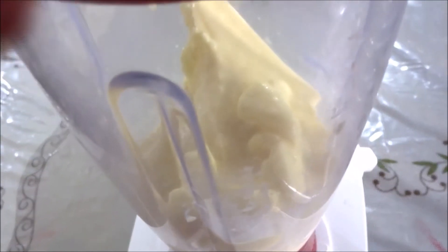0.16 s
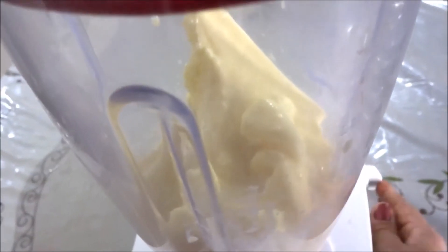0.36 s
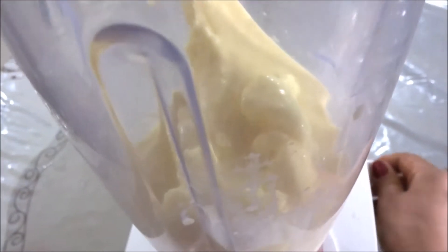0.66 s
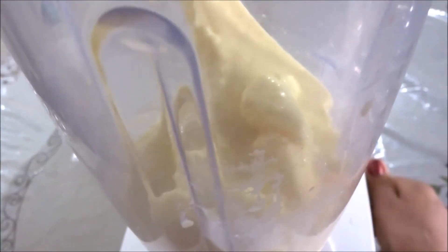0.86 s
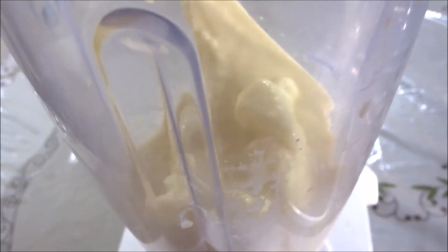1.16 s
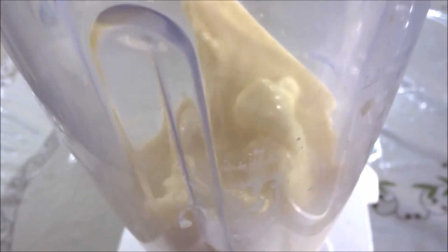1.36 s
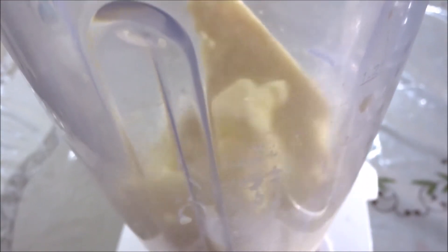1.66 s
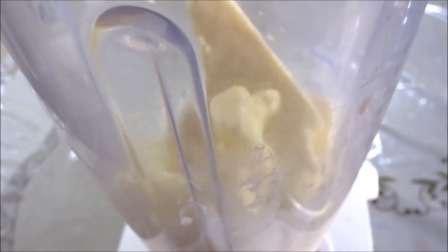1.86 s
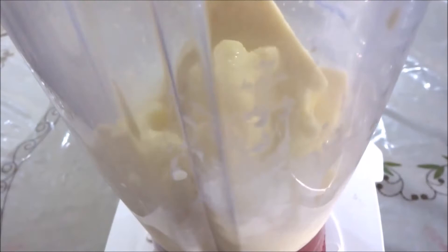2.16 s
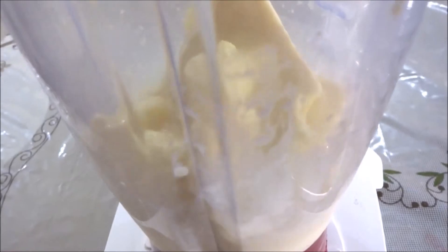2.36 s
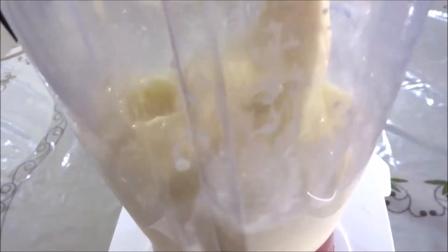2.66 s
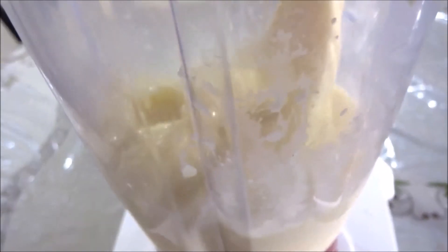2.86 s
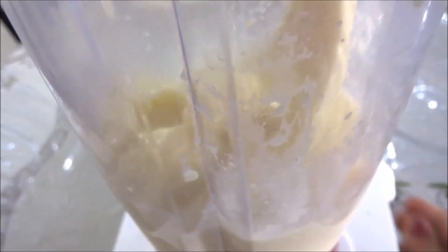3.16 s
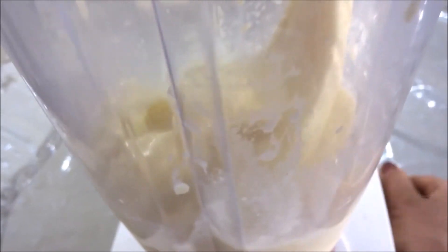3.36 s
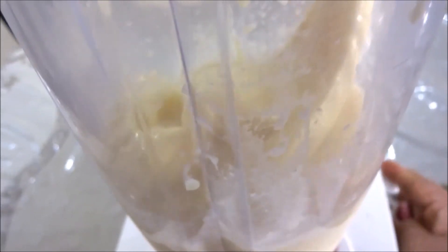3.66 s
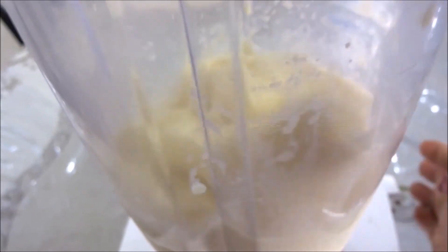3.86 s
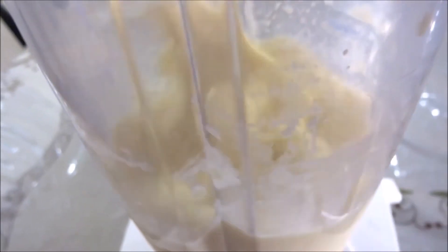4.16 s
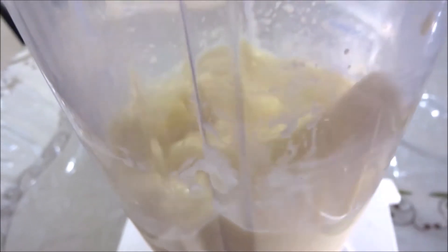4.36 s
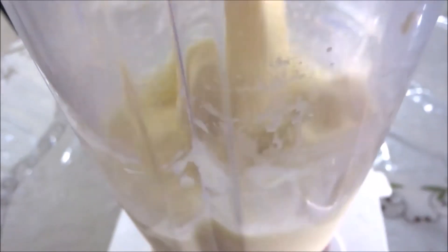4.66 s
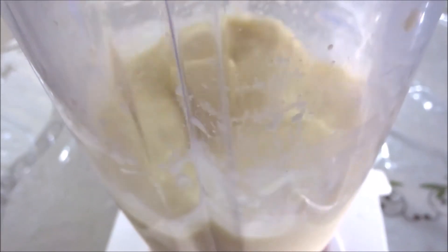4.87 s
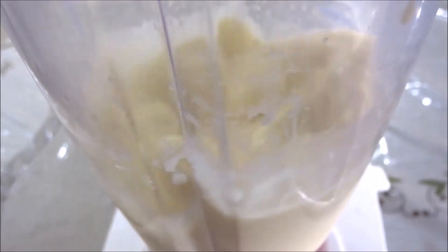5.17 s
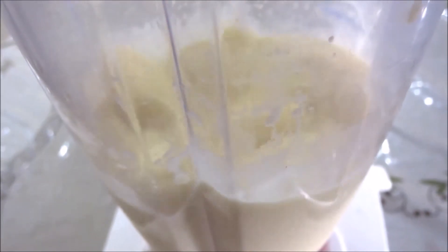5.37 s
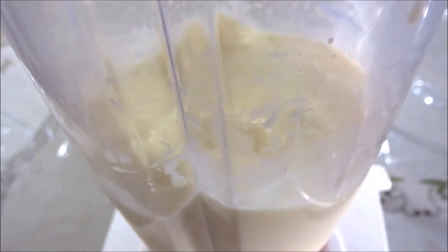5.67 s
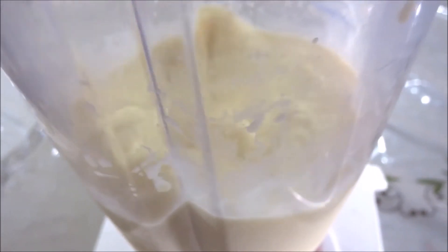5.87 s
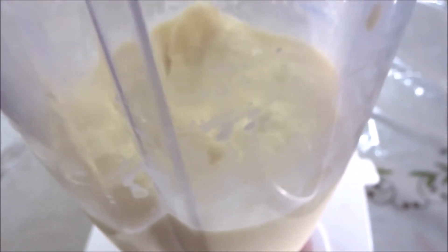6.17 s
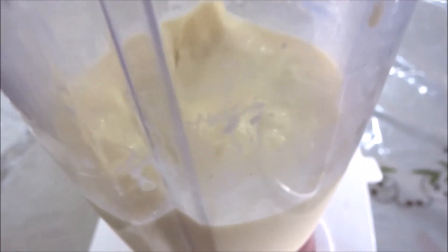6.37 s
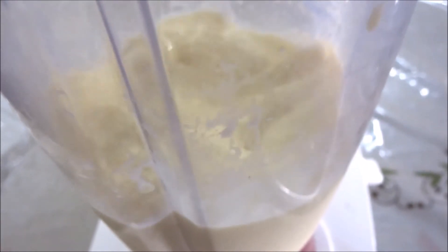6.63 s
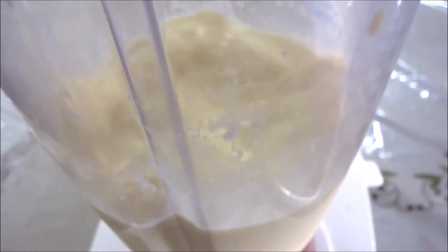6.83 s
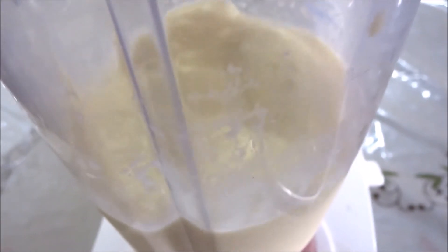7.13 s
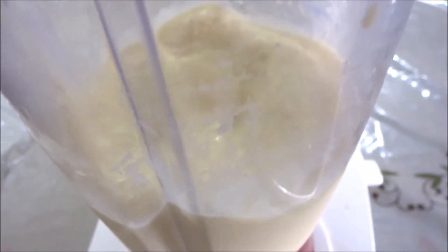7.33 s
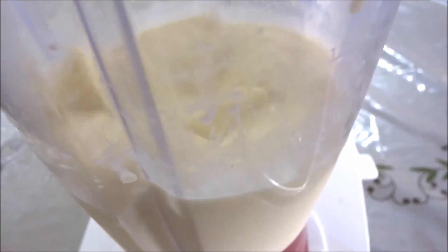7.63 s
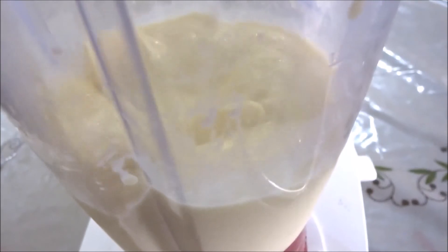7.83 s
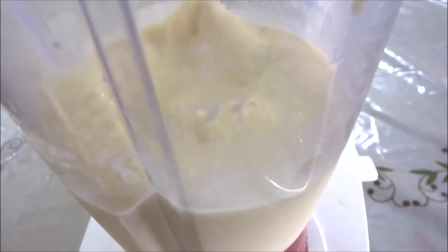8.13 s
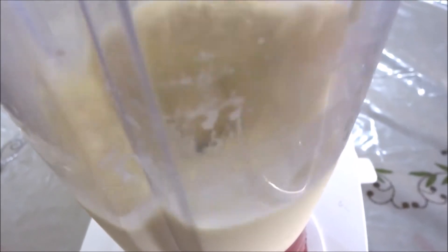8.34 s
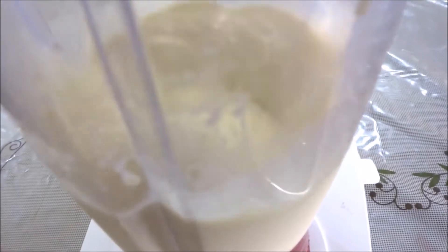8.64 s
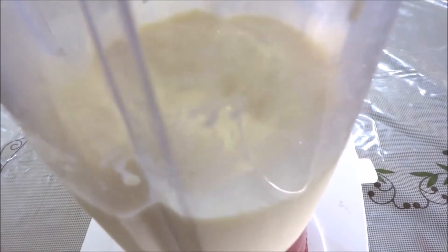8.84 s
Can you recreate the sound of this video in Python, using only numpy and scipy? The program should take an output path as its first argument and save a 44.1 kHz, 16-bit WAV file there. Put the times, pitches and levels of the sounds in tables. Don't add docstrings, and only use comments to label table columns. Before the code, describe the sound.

Skin rustles close by, a plastic knob clicks, then a kitchen mixer grinder jolts on with a rattling jar and whines over a churning roar.

```python
import sys
import numpy as np
from scipy import signal
from scipy.fft import rfft, irfft
from scipy.io import wavfile
from scipy.ndimage import uniform_filter1d

SR = 44100
rng = np.random.default_rng(int(sys.argv[2]) if len(sys.argv) > 2 else 0)


def gain_from_db(level_db):
    decades = np.asarray(level_db, float) / 20
    return 10 ** decades


def wrap_up_sound(samples):
    columns = np.atleast_2d(samples).T
    tamed = np.clip(columns, -1, 1)
    steps = np.round(tamed * 32767).astype(np.int16)
    wavfile.write(sys.argv[1], SR, steps)


N = 396900
T = np.arange(N) / SR
MOTOR_ON_S = .859

# freq_hz, level_db (per Hz)
RUB_COLOUR = [(70, -38), (150, -11.5), (400, -2), (900, -11.5), (1500, -17), (16000, -62)]
RUSTLE_COLOUR = [(300, -35), (1500, -7.5), (3500, -3.5), (7000, -8), (11000, -13), (16000, -18)]
CRINKLE_COLOUR = [(2000, -21), (6000, -1), (10000, -2), (16000, -15)]
# start_s, length_s, rub_db, rustle_db, crinkle_db
HAND_STROKES = [
    (-.02, 0.059, -49, -55, -39.5),
    (0.031, 0.087, -48.5, -40.5, -50),
    (0.122, 0.094, -50, -55, -60),
    (0.247, 0.037, -62, -53, -60),
    (0.289, 0.052, -70, -45.5, -50),
    (0.475, .11, -84, -55, -57),
    (0.618, 0.036, -82, -67, -59),
    (0.726, 0.039, -82, -60, -72),
    (.83, .05, -66, -62, -77),
]
# rub_db, rustle_db, crinkle_db
RESTING_DB = (-84, -58.5, -68)
# time_s, pitch_hz, level_db
SQUEAK_GLIDE = [
    (.058, 11000, -62),
    (.066, 12900, -42),
    (.078, 13400, -42),
    (.095, 12800, -36),
    (.104, 13200, -60),
]
# freq_hz, likeness (0-1)
SIDE_LIKENESS = [(60, 1.0), (110, .99), (200, .96), (380, .97), (700, .975), (1290, 0.99), (2380, 0.91),
                 (4400, 0.9), (8120, 0.95), (15000, 0.94)]
# freq_hz, level_db (per Hz)
HISS_COLOUR = [(24, -68), (40, -42), (193, -36), (400, -10.5), (464, -23), (659, -6), (935, -7.5),
               (1290, 3.5), (2030, 1.5), (2480, -6), (3800, -5), (6260, -23), (15800, -15)]
# pitch_hz, level_db
APPLIANCE_HUM = [(576, -76.5), (662, -74), (1319, -95), (1981, -68)]
# start_s, peak_db, ring_share (0 dry tick, 1 all ring)
KNOB_CLICKS = [
    (.2522, -11, .65),
    (.3013, -9, .65),
    (.3048, -8, .65),
    (.3075, -23, .6),
    (.3098, -19, .8),
    (.404, -38, .1),
    (.4246, -23, .05),
    (.4565, -42, .3),
    (.513, -37, .3),
    (.7475, -38, .3),
]
# pitch_hz, level_db, t60_s
KNOB_MODES = [(3500, -4, .02), (3750, -1, .03), (4100, -4, .022), (4450, -4, .025), (4700, -3, .025),
              (5500, -8, .01), (6420, -6, .012), (7550, -7, .012), (9800, -12, .006), (11700, -7, .014),
              (13900, -9, .005)]
# start_s, peak_db
JAR_KNOCKS = [(.456, -44), (.515, -42), (.643, -44), (.7705, -35), (.7775, -31), (.8595, -18), (.8655, -17),
              (.874, -21), (.8855, -18), (.898, -22), (.907, -24), (.916, -20), (.925, -22), (.934, -20),
              (.944, -20), (.957, -29), (.975, -30)]
# pitch_hz, level_db, t60_s
BASE_MODES = [(1050, -11, .04), (1130, -5, .05), (1220, 0, .09), (1380, -1, .05), (1590, 0, .07),
              (1720, -4, .04), (2100, -17, .05)]
# time_s, blade_pass_hz
MOTOR_LOAD = [(.861, 666), (1.304, 640), (1.349, 605), (1.689, 569), (1.897, 678), (2.222, 655),
              (2.42, 611), (3.459, 611), (3.46, 755), (4.25, 861), (4.749, 757), (4.895, 771), (5.079, 917),
              (6.93, 895), (6.995, 792), (7.407, 884), (8.284, 888), (9, 897)]
# release_s, drag_hz, length_s
BRAKING_LUMPS = [(1.779, 107, .091), (2.75, 15, .31), (2.745, 34, .07), (3.24, -14, .07),
                 (3.888, 119, .099), (4.41, 65, .34), (5.255, 280, .12), (5.315, 150, .06),
                 (5.457, 272, .097), (5.657, 45, .09), (6.111, 53, .122), (6.389, 39, .09),
                 (6.585, 45, .05), (6.695, 200, .08), (7.158, 56, .04), (7.528, 165, .106),
                 (7.69, 208, .088), (7.992, 44, .044), (8.225, 25, .108), (8.725, 113, .417)]
# multiple (of blade pass), slow_db, fast_db
WHINE_ORDERS = [(3, -58, -60), (4, -59, -56), (5, -53, -62), (6, -52, -57), (8, -52, -59), (10, -62, -54),
                (14, -63, -53), (16, -59, -55.5), (20, -61, -64), (24, -55, -70)]
# pitch_hz, level_db
FIRST_RESPONSE = [(350, -68), (430, -51), (560, -56.5), (605, -50), (700, -54.5), (862, -54), (888, -41.5),
                  (920, -47)]
OCTAVE_RESPONSE = [(800, -56), (1040, -51), (1090, -37.5), (1190, -38.5), (1218, -50), (1280, -43.5),
                   (1500, -48.5), (1800, -46)]
# pitch_hz, width_hz, lift_db
OCTAVE_RING = [(1203, 37, 8.5)]
# pitch_hz, width_hz, lift_db
TWELFTH_RING = [(10780, 260, 28.7)]
# pitch_hz, width_hz, lift_db
CASING_RINGS = [(1580, 150, 15), (4000, 200, 11), (4900, 200, 6.5), (14800, 900, 7)]
# freq_hz, level_db (per Hz)
SLOW_ROAR = [(24, -66), (40, -32.5), (311, -29.5), (513, -24), (627, -28), (747, -20), (959, -15.5),
             (1170, -1.5), (1750, -12), (2480, -3.5), (3110, -4), (4520, -5), (6920, -9), (8240, -6),
             (15800, -15.5)]
FAST_ROAR = [(24, -67), (40, -37), (311, -33), (500, -28.5), (959, -18.5), (1110, -9), (1360, -9),
             (1620, -6.5), (2190, -5), (3030, -2), (3700, -6.5), (4410, -5), (6920, -8.5), (9340, -6.5),
             (15800, -17.5)]
# pitch_hz, width_hz, lift_db
JAR_RINGS = [(920, 60, 3), (1135, 35, 6), (1197, 28, 7), (1325, 80, 5), (1440, 35, 4), (1570, 55, 6),
             (1800, 60, 3), (2780, 90, 2), (2880, 50, 2), (3080, 130, 4), (3640, 70, 3), (4030, 120, 2),
             (4550, 400, 2), (6050, 500, 2), (8350, 500, 3)]
# freq_hz, level_db
MIC_RESPONSE = [(20, 0), (15740, 0), (15830, -46), (16950, -48), (17000, -90)]


def evened(x):
    return x / np.sqrt(np.mean(x ** 2) + 1e-20)


def read(points, hz):
    f, value = np.transpose(points)
    return np.interp(np.log(hz + 1), np.log(f + 1), value)


def columns(rows, t=T):
    s, *rest = np.transpose(rows)
    return [np.interp(t, s, c) for c in rest]


def smooth_twice(x, size):
    return uniform_filter1d(uniform_filter1d(x, size), size)


def drift(smooth_s):
    return evened(smooth_twice(rng.standard_normal(N), max(int(smooth_s * SR), 1)))


def noise(colour_db, patchy_db, gust_db, count=N):
    frames = count // 256 + 5
    hz = np.fft.rfftfreq(1024, 1 / SR)[:, None]
    a, b, c, d, patches = rng.standard_normal((frames, 513, 5)).T
    patches = uniform_filter1d(patches, size=14, axis=0)
    patches = evened(uniform_filter1d(patches, size=12, axis=1))
    gusts = evened(uniform_filter1d(rng.standard_normal(frames), size=8))
    same = np.clip(read(SIDE_LIKENESS, hz), -1, .996)
    left = a + 1j * b
    right = same * left + np.sqrt(1 - same ** 2) * (c + 1j * d)
    level_db = colour_db(hz, np.arange(frames) * 256 / SR) + patchy_db * patches + gust_db * gusts
    spectra = np.array([left, right]) * gain_from_db(level_db)
    sound = signal.istft(spectra, nperseg=1024, noverlap=768)[1][:, :count]
    return np.pad(evened(sound), ((0, 0), (0, N - count)))


def ring(modes, scrape, scrape_s):
    t = T[:6000]
    x = sum(gain_from_db(db - 60 * t / t60) * np.sin(2 * np.pi * hz * t) for hz, db, t60 in modes)
    x = signal.fftconvolve(x, scrape * gain_from_db(-60 * T[:len(scrape)] / scrape_s))
    return x / abs(x).max()


def add(mix, s, sound):
    part = mix[round(s * SR):][:len(sound)]
    part += sound[:len(part)]


def high_pass(x, hz):
    return signal.sosfilt(signal.butter(4, hz, "high", fs=SR, output="sos"), x)


def humps(modes, hz):
    return sum(db / (1 + (2 * (hz - f) / width) ** 2) for f, width, db in modes)


def filtered(x, colour_db):
    return irfft(rfft(x) * gain_from_db(colour_db(np.fft.rfftfreq(N, 1 / SR))), N)


def strokes():
    touch_s, lift_s = 0.014, .018
    power = gain_from_db(RESTING_DB)[:, None] ** 2 * np.ones(N)
    for s, length, *layers_db in HAND_STROKES:
        landing = np.clip((T - s) / touch_s, 0, 1)
        shape = landing * np.exp(-np.maximum(T - s - length, 0) / lift_s)
        power = power + (gain_from_db(layers_db)[:, None] * shape) ** 2
    return np.sqrt(power)


def hand():
    skin = np.zeros((2, N))
    for colour, gain in zip((RUB_COLOUR, RUSTLE_COLOUR, CRINKLE_COLOUR), strokes()):
        skin += gain * noise(lambda hz, t: read(colour, hz), patchy_db=2.5, gust_db=2.0, count=SR)
    hz, db = columns(SQUEAK_GLIDE)
    sounding = (T > SQUEAK_GLIDE[0][0]) & (T < SQUEAK_GLIDE[-1][0])
    squeak = np.sqrt(2) * gain_from_db(db) * sounding * np.sin(2 * np.pi * np.cumsum(hz) / SR)
    return skin * (T < MOTOR_ON_S) + squeak


def kitchen():
    hum = sum(np.sqrt(2) * gain_from_db(db) * np.sin(2 * np.pi * hz * T) for hz, db in APPLIANCE_HUM)
    hiss = noise(lambda hz, t: read(HISS_COLOUR, hz), patchy_db=1.8, gust_db=1.2, count=SR)
    return hum + gain_from_db(-55.5) * hiss


def knob():
    out = np.zeros(N)
    for s, db, share in KNOB_CLICKS:
        scrape = rng.standard_normal(800)
        share = np.clip(share, 0, 1)
        tick = scrape * gain_from_db(-60 * T[:800] / .005)
        add(out, s, gain_from_db(db) * share * ring(KNOB_MODES, scrape, scrape_s=.003))
        add(out, s, gain_from_db(db) * (1 - share) * tick)
    return high_pass(high_pass(out, hz=3200), hz=3200)


def knocks():
    out = np.zeros(N)
    soft = np.clip(T[:1500] / .0015, 0, 1)
    for s, db in JAR_KNOCKS:
        scrape = rng.standard_normal(1500) * soft
        detune = 1 + 0.027 * rng.standard_normal(len(BASE_MODES))
        modes = [(hz * d, level, t60) for (hz, level, t60), d in zip(BASE_MODES, detune)]
        add(out, s, gain_from_db(db) * ring(modes, scrape, scrape_s=.008))
    return high_pass(out, hz=1050)


def speed_hz(t=T):
    inertia_s, grip_s, lead_s = .071, .02, .01
    ms = np.arange(0, N / SR + 1, .001)
    pull = columns(MOTOR_LOAD, ms)[0] * (ms > MOTOR_ON_S - lead_s)
    for end, drag_hz, length in BRAKING_LUMPS:
        grab = np.clip((ms - end + length) / grip_s, 0, 1)
        release = np.clip((end - ms) / grip_s, 0, 1)
        pull = pull - drag_hz * grab * release
    keep = np.exp(-.001 / inertia_s)
    return np.interp(t, ms, signal.lfilter([1 - keep], [1, -keep], pull))


def setting(hz):
    return np.clip((hz - 670) / 90, 0, 1)


def drag(t=T):
    hz = speed_hz(t)
    return setting(hz) * (900 - hz)


def whine():
    hz = speed_hz()
    fast = setting(hz)
    creep_cycles = np.cumsum(14 * (1 + .4 * drift(.04))) / SR
    creep = uniform_filter1d(creep_cycles % 1 - .5, size=200)
    now_hz = hz * (1 + (.011 + .014 * fast) * creep + .003 * drift(.004))
    turns = np.cumsum(now_hz) / SR
    ringing_hz = uniform_filter1d(now_hz, size=600)
    rise = uniform_filter1d(np.gradient(hz) * SR, size=1500)
    pull_db = np.clip(rise / 150, -6, 5)

    first_db = read(FIRST_RESPONSE, ringing_hz) + 2.0 * drift(0.011) + 2.5 * fast * drift(.03)
    octave_db = read(OCTAVE_RESPONSE, 2 * ringing_hz) + 1.8 * drift(0.0043)
    octave_db += humps(OCTAVE_RING, 2 * ringing_hz) * np.clip(1 - pull_db, 0, 1)
    twelfth_db = -70 + humps(TWELFTH_RING, 12 * ringing_hz) + 2.9 * drift(0.011)
    rows = [(1, first_db), (2, octave_db), (12, twelfth_db)]
    flutter = drift(.02)
    for order, slow_db, fast_db in WHINE_ORDERS:
        db = (1 - fast) * slow_db + fast * (fast_db + pull_db)
        db += (1 - fast) * humps(CASING_RINGS, order * hz)
        db += (3 + .5 * fast) * np.roll(flutter, rng.integers(N))
        rows.append((order, db))
    tones = sum(gain_from_db(db) * np.sin(2 * np.pi * (order * turns + rng.random())) for order, db in rows)
    return np.sqrt(2) * tones * np.clip((T - MOTOR_ON_S) / 0.026, 0, 1)


def roar_colour_db(hz, t):
    speed = speed_hz(t)
    fast = setting(speed)
    gulps, splashes = evened(uniform_filter1d(rng.standard_normal((2, len(t))), size=3))
    vortex_hz = 3010 * (speed / 850) ** .4
    gulps_db = 0.5 + 0.0156 * drag(t) + 1.7 * gulps
    vortex = fast * gulps_db * np.exp(-((hz - vortex_hz) / 300) ** 2)
    hollow = fast * (7.0 + 4.1 * splashes) * np.exp(-((hz - 2.53 * speed) / 280) ** 2)
    thaw_s, rasp_hz, rasp_db = 0.44, 6100, 3
    rasp = rasp_db * np.exp(-((t - MOTOR_ON_S) / thaw_s) ** 2 - ((hz - rasp_hz) / 600) ** 2)
    churn = (1 - fast) * read(SLOW_ROAR, hz) + fast * read(FAST_ROAR, hz)
    return churn + vortex - hollow + rasp


def roar():
    chop = gain_from_db(1.0 * drift(.002))
    slurry = noise(roar_colour_db, patchy_db=1.01, gust_db=0.25)
    slurry = filtered(slurry, lambda hz: humps(JAR_RINGS, hz))
    on = np.clip((T - MOTOR_ON_S) / 0.046, 0, 1) ** 0.38
    return on * gain_from_db(-29.8 + 0.0045 * drag()) * evened(chop * slurry)


def room(x, t60):
    t = T[:SR // 2]
    tail = rng.standard_normal((2, len(t))) * gain_from_db(-60 * t / t60) * (t > .003)
    return signal.fftconvolve(x[None], tail / np.linalg.norm(tail[0]), axes=1)[:, :N]


def scene():
    clicks = knob() + knocks()
    tones = whine()
    wet = gain_from_db(-10.5) * room(clicks, t60=0.19) + gain_from_db(-22) * room(tones, t60=0.084)
    return hand() + kitchen() + clicks + tones + wet + roar()


def roll_off(x):
    return signal.sosfilt(signal.butter(12, 16990, fs=SR, output="sos"), x)


def record(dry):
    heard = filtered(dry, lambda hz: read(MIC_RESPONSE, hz))
    return roll_off(heard)


dry = scene()
out = record(dry)
wrap_up_sound(out)
```